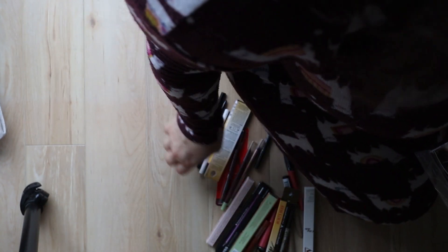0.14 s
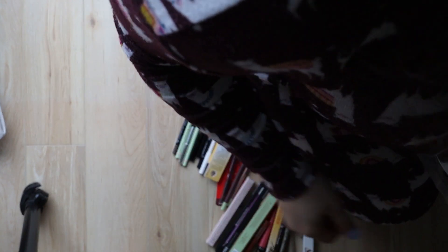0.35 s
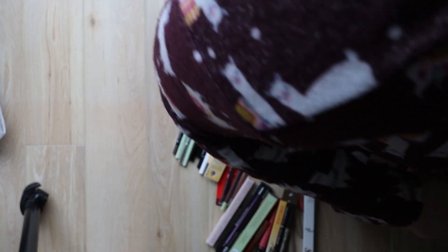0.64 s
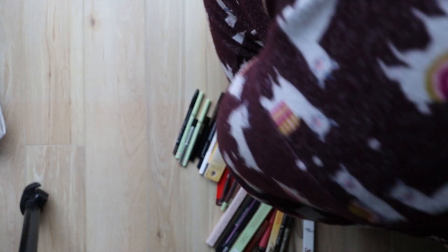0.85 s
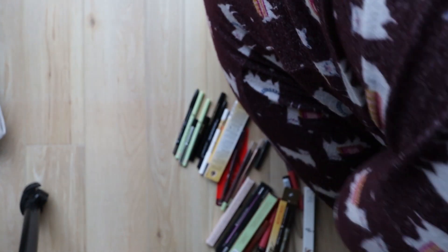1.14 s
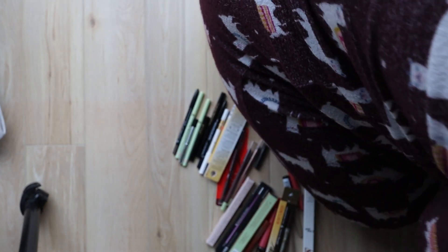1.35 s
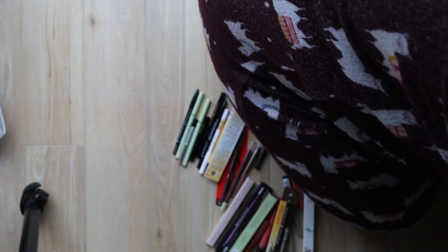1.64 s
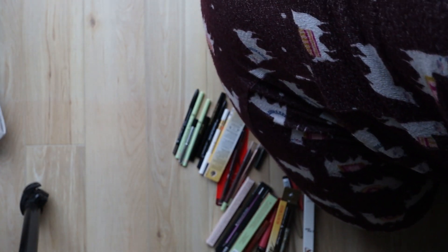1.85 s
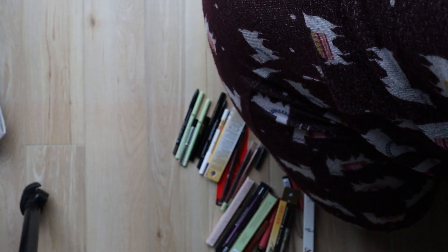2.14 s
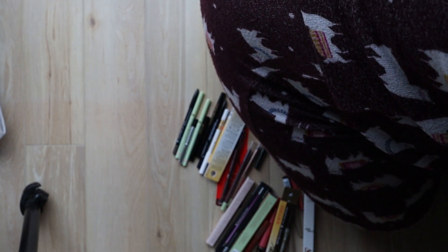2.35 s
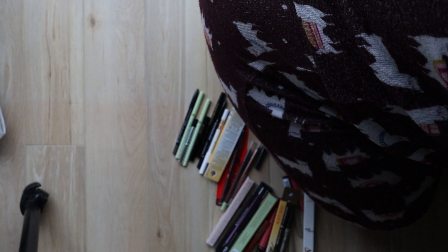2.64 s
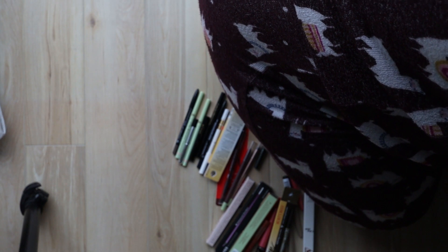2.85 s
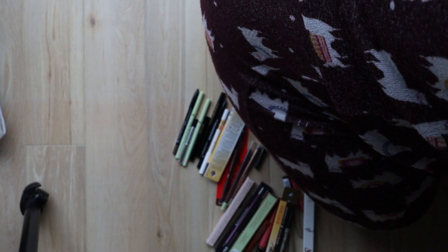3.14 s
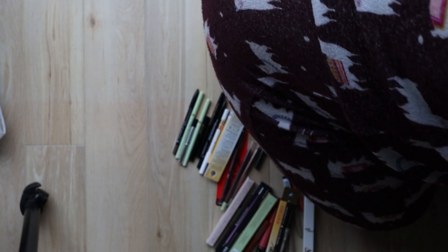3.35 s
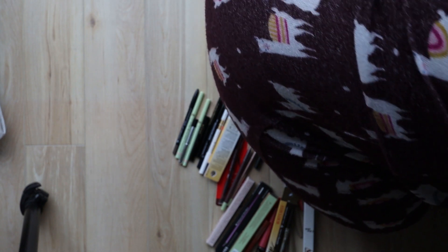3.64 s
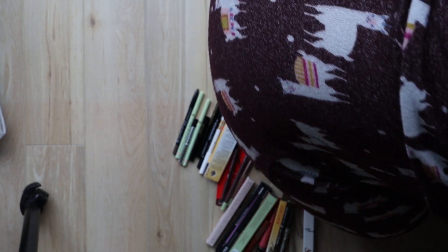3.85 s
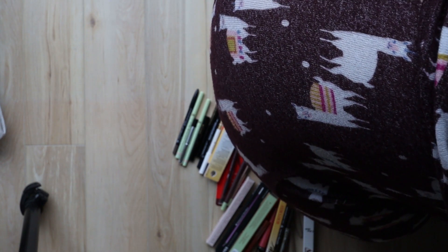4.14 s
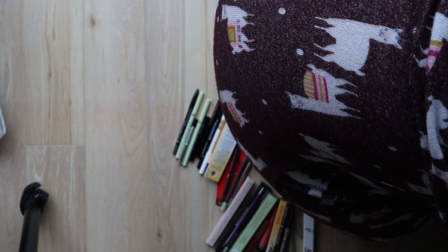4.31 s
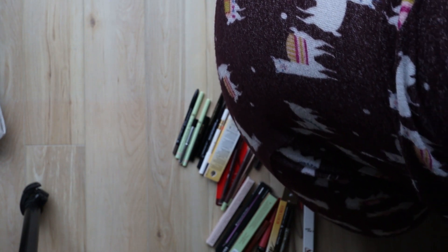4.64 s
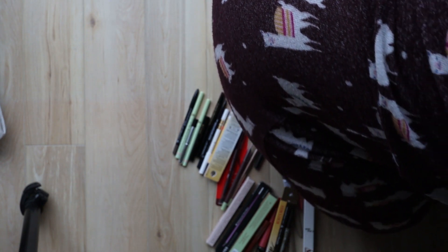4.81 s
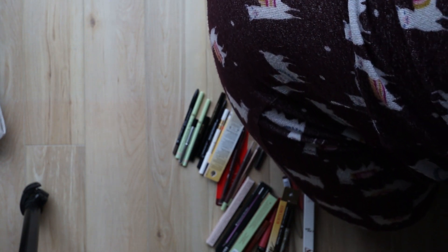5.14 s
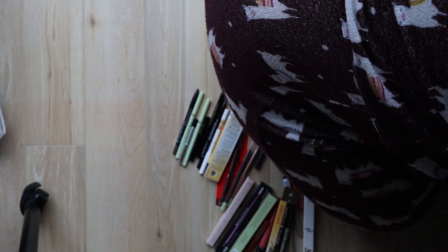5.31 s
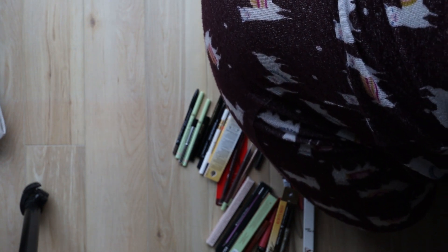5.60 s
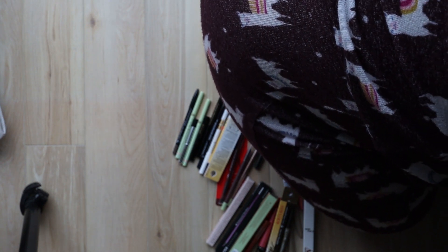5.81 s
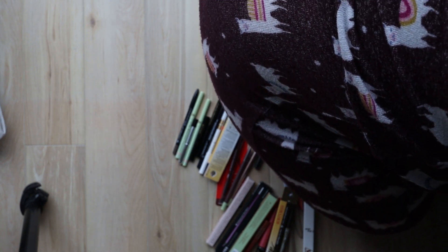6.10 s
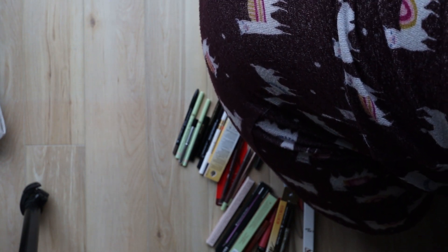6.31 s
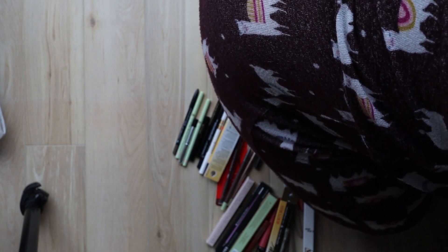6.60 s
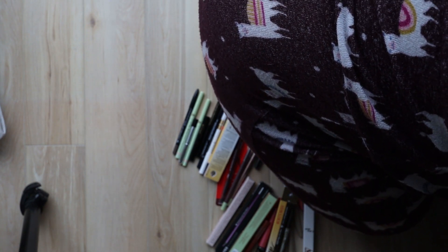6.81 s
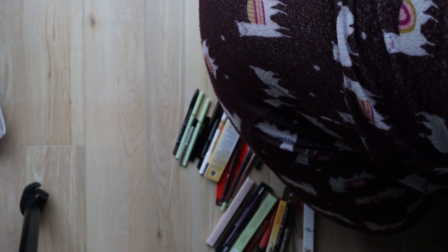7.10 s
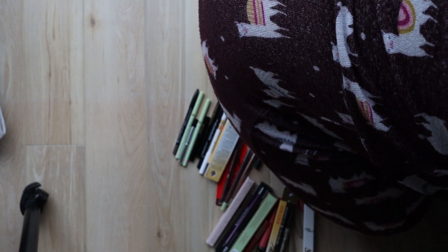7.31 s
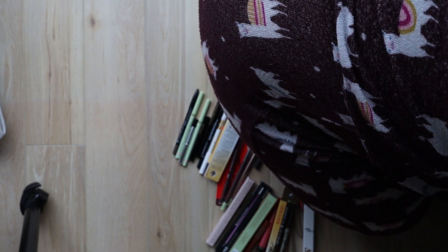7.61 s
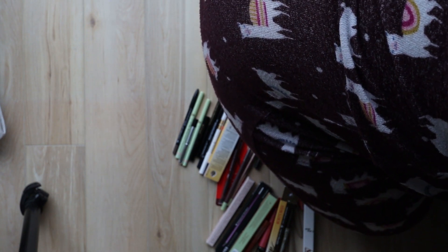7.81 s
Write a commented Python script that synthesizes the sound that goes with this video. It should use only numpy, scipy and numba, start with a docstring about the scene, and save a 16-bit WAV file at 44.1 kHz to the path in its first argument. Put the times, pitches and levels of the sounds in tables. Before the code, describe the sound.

Hollow plastic pencils and tubes knock and clatter in short bursts on a wooden floor, with quiet gaps and a faint low hum.

```python
"""Plastic pencils and tubes are set down, knocked and shuffled on a wooden floor in a small furnished room.
Soft knocks lead to a hard flurry at 1.4 s; then sparse, mostly quiet ones until a burst at 4.3 s, and clusters
from 5 s to the end. Each knock rings hollow plastic, cracks and thumps the boards; fine ticks rattle around them.
A short room tail answers over low hum and hiss; the recorder ducks after loud knocks and clips the hardest."""
import sys
import numpy as np
from scipy import signal
from scipy.fft import rfft, irfft
from scipy.io import wavfile
from scipy.ndimage import uniform_filter1d
from numba import njit

SR = 44100
rng = np.random.default_rng(int(sys.argv[2]) if len(sys.argv) > 2 else 0)


def persist_wave(psi):
    """Save psi, clipped to +-1, as 16-bit WAV."""
    counts = np.round(np.clip(psi, -1, 1) * 32767).astype(np.int16)
    wavfile.write(sys.argv[1], SR, np.atleast_2d(counts).T)


N = 351036
T = np.arange(N) / SR  # s


def undb(db):
    """Decibels to an amplitude factor."""
    return 10 ** (np.asarray(db) / 20)


def unit(x):
    """Scale to an RMS of 1."""
    return x / np.sqrt(np.mean(x ** 2))


def colour(x, points):
    """Filter through (Hz, dB) points joined on a log-frequency axis."""
    hz, db = np.transpose(points)
    f = np.fft.rfftfreq(len(x), 1 / SR)
    gain = undb(np.interp(np.log(f + 1), np.log(hz), db))
    return irfft(rfft(x) * gain, len(x))


def band(x, lo_hz, hi_hz):
    """Band-pass with gentle slopes."""
    sos = signal.butter(2, [lo_hz, min(hi_hz, SR / 2.1)], "band", fs=SR, output="sos")
    return signal.sosfilt(sos, x)


def thin(x, hz):
    """Slim objects radiate almost nothing below their lowest ring."""
    return signal.sosfilt(signal.butter(4, hz, "high", fs=SR, output="sos"), x)


def decay(t, t60):
    """Exponential die-away that falls 60 dB in t60 seconds."""
    return np.exp(-np.log(1000) * t / t60)


def ring(hz, db, t60):
    """A sum of decaying modes, struck at time 0."""
    t = T[:SR // 8, None]
    return np.sum(undb(db) * decay(t, t60) * np.sin(2 * np.pi * hz * t), axis=1)


@njit
def resonate(x, hz, q):
    """State-variable band-pass whose centre moves."""
    y, band_state, low_state = np.empty(len(x)), 0., 0.
    for i in range(len(x)):
        g = np.tan(np.pi * hz[i] / SR)
        v = (band_state + g * (x[i] - low_state)) / (1 + g * (g + 1 / q))
        band_state = 2 * v - band_state
        low_state += 2 * g * v
        y[i] = v / q
    return y


@njit
def follow(x, attack, release):
    """Envelope that rises fast and sinks slowly."""
    e, out = 0., np.empty(len(x))
    for i in range(len(x)):
        e += (abs(x[i]) - e) * (attack if abs(x[i]) > e else release)
        out[i] = e
    return out


def air():
    """Steady room tone and microphone hiss: coloured noise."""
    # Spectrum of the quiet room. Each row: frequency in Hz, relative density in dB per Hz.
    air_colour = [(20, -24), (50, -27.5), (90, -19), (130, -20.5), (200, -22.5), (320, -24), (400, -22),
                  (500, -26.5), (760, -26), (2000, -34), (16000, -41)]
    level_db = -54
    return undb(level_db) * unit(colour(rng.standard_normal(N), air_colour))


def hum():
    """A low tone that sags slowly, with a wavering undertone of narrow-band noise."""
    # Loudness of the hum at the microphone. Each row: time in seconds, RMS level of the tone in dB.
    hum_levels = [(0, -57), (.6, -61.5), (1.8, -57), (2.8, -52.5), (3.7, -50), (4.92, -50), (5.2, -59),
                  (6.3, -56.5), (7.8, -59)]
    hum_hz, sag_hz_per_s = 91, 0.7
    undertone_hz, undertone_width_hz, undertone_db = 75.5, 5.8, -11.5
    drift = 0.6 * np.cumsum(rng.standard_normal(N)) / np.sqrt(SR)  # random walk of the phase, radians
    # halving the sag here makes the pitch itself fall at the full rate
    tone = np.sqrt(2) * np.sin(2 * np.pi * (hum_hz - sag_hz_per_s * T / 2) * T + drift)
    q = undertone_hz / undertone_width_hz
    centre = np.full(N, 1. * undertone_hz)
    once = resonate(rng.standard_normal(N), centre, q)
    undertone = unit(resonate(once, centre, q))
    level = undb(np.interp(T, *np.transpose(hum_levels)))
    return level * (tone + undb(undertone_db) * undertone)


def tail():
    """The walls' answer to one spot: dense, with a very quick onset, each band dying at its own rate."""
    # How the furnished room dies away. Each row: frequency in Hz, t60 in seconds, relative level in dB.
    room_bands = [(202, 0.32, 13.5), (500, 0.29, 3), (1200, 0.45, 0), (3000, 0.47, -1), (7100, 0.47, 4),
                  (13000, 0.21, 2)]
    tail_db = -5  # energy of the whole tail against the direct sound
    t = T[:SR // 2]
    hz, t60, db = np.transpose(room_bands)
    out = 0
    for f in 140 * 2 ** np.arange(0, 7, .5):  # half-octave bands
        fall = decay(t, np.interp(np.log(f), np.log(hz), t60))
        level = undb(np.interp(np.log(f), np.log(hz), db))
        out = out + level * fall * band(rng.standard_normal(len(t)), f, f * np.sqrt(2))
    out = out * (1 - np.exp(-t / 0.00022))
    return undb(tail_db) * out / np.sqrt(np.sum(out ** 2))


def room(dry):
    """The contacts hop between a few spots, and each spot has its own paths to the microphone."""
    spots, spot_s = 5, .03
    spot = (T / spot_s).astype(int) % spots
    out = np.zeros(N)
    for k in range(spots):
        # a 10 ms crossfade from spot to spot
        fade = np.sqrt(np.abs(uniform_filter1d(1. * (spot == k), SR // 100)))
        out += signal.fftconvolve(dry * fade, tail())[:N]
    return out


def jostles():
    """Each jostle swells to its loudest moment and fades; the loudest one sets the pitch."""
    # Pencils rolling and jostling on the floor. Each row: loudest moment in seconds, relative level in dB,
    # click level against the ring in dB, pitch of the loudest piece in Hz, swell in dB/s, fade in dB/s.
    jostle_rows = [(0.724, -49, -31, 1420, 58, 70.5), (0.935, -29, -13.5, 1160, 274, 570),
                   (1.024, -52.5, -20.5, 1380, 500, 135), (1.271, -39.5, -37, 1100, 907, 101),
                   (1.354, -13.5, -18, 996, 1396, 907), (1.373, -23, -13.5, 1360, 392, 114.5),
                   (1.48, -17.5, -6, 1310, 150, 133), (1.547, -21.5, -15, 1410, 199.5, 341.5),
                   (1.913, -13.5, -9.5, 1500, 9000, 702), (1.94, -35, -6.5, 1900, 1003.5, 114),
                   (2.16, -32, -5.5, 1382, 494, 156), (2.389, -49, -12, 1240, 56, 106),
                   (2.694, -52, -7, 870, 200.5, 86.5), (4.144, -45.5, -19, 1230, 792, 37.5),
                   (4.284, -35.5, -8, 1000, 98.5, 301.5), (4.306, -7.5, -8.5, 1240, 4000, 700),
                   (4.328, -17.5, -7, 1250, 593.5, 121.5), (4.66, -35, -10.5, 1030, 4000, 135),
                   (4.754, -46.5, -12.5, 1160, 1000, 73.5), (4.842, -28, -14, 1010, 3000, 223),
                   (5.058, -7.5, -7, 1080, 15000, 699.5), (5.091, -36, -2, 1090, 596, 87.5),
                   (5.202, -9.5, -17.5, 1040, 830, 250), (5.27, -16.5, -9, 900, 205, 200),
                   (5.39, -12.5, -10, 1170, 598, 315), (5.707, -25, -8, 1320, 5000, 78.5),
                   (6.046, -16, -9, 1030, 899, 416), (6.115, -34, -3, 1000, 152, 196),
                   (6.152, -16, -11.5, 912, 4000, 348), (6.796, -30.5, -17, 845, 1200, 200),
                   (6.873, -25, -17, 1652, 4998, 258), (6.98, -32, -9, 800, 4000, 400),
                   (7.009, -29.5, -14, 1060, 3000, 300), (7.157, -17, -8.5, 1030, 1500, 343.5),
                   (7.53, -14.5, -6.5, 920, 12000, 262), (7.658, -7, -7.5, 981, 1494.5, 412),
                   (7.773, -7, -7, 933, 9000, 700), (7.793, -8, -9.5, 935, 800, 380)]
    s, db, bright_db, hz, swell, fade = (c[:, None] for c in np.transpose(jostle_rows))
    coarse = T[::44]  # about 1 ms steps
    before, after = np.maximum(s - coarse, 0), np.maximum(coarse - s, 0)
    rings = undb(db - swell * before - fade * after)
    clicks = undb(bright_db) * rings
    pitch_hz = hz[np.argmax(rings, axis=0), 0]
    return (np.interp(T, coarse, c) for c in (rings.sum(axis=0), clicks.sum(axis=0), pitch_hz))


def rattle():
    """Many small uneven ticks: a brief hollow ring and a brighter click each."""
    # Hollow colour of the heap of ticks. Each row: frequency in Hz, relative density in dB per Hz.
    tick_colour = [(120, -56), (200, -46), (436, -38.5), (497, -18), (812, -3), (1180, -8.5), (1440, -3.5),
                   (2120, -10.5), (3500, -27.5), (4550, -37.5), (7700, -120)]
    # Bright colour of the clicks, each pair: frequency in Hz, relative gain in dB.
    click_colour = [(1300, -35.5), (2400, 10), (3500, 10), (7000, -5.5), (12000, -22), (16000, -34)]
    ticks_per_s, scatter_db = 1400, 1.8
    when, size = rng.random(N), rng.exponential(size=N)
    ticks = (when < ticks_per_s / SR) * undb(scatter_db * size)
    # each tick is a contact of a few milliseconds
    contact = signal.lfilter([1], [1, -np.exp(-1 / (0.003 * SR))], ticks)
    rings, clicks, pitch_hz = jostles()
    heap = unit(colour(contact * rng.standard_normal(N), tick_colour))
    piece = unit(resonate(contact * rng.standard_normal(N), pitch_hz, 7.3))
    click = unit(colour(contact * rng.standard_normal(N), click_colour))
    return thin(rings * (0.62 * heap + .3 * piece), 450) + clicks * click


def knocks():
    """Every knock rings a tube, snaps a short crack and thumps the boards, each a little differently."""
    # Knocks on the floor. Each row: start in seconds, level in dB, pitch of the struck piece in Hz,
    # crack and board thump against the ring, both in relative dB, ring time in seconds before limiting.
    knock_rows = [(0.678, -43, 687, -2, -21, 0.068), (0.705, -36.5, 1486, -29.5, -8, 0.1),
                  (0.783, -37.5, 1100, -20, -49, 0.068), (0.847, -26.5, 1350, -16, -27, 0.023),
                  (0.891, -18.5, 1510, -37, -42, 0.015), (0.905, -21, 1300, -11, -30.5, .015),
                  (0.913, -22, 970, -14, -33, 0.075), (0.935, -19, 1037, -16, -8, 0.046),
                  (1.013, -24, 1500, -29.5, -7.5, 0.052), (1.171, -34, 1390, -35, 1.5, 0.008),
                  (1.274, -21.5, 1400, -14, -4.5, 0.015), (1.31, -24, 960, -18, -34, 0.021),
                  (1.319, -21, 900, -14.5, -5, 0.033), (1.357, 1, 1415, -6.5, -41, 0.054),
                  (1.384, -7, 850, -10, -44, 0.017), (1.405, -10, 884, -12, -59, 0.045),
                  (1.421, -10, 2100, -11, -19, 0.091), (1.446, -3.5, 790, -15.5, -77, 0.036),
                  (1.469, 0, 2060, -14, -20, 0.015), (1.488, -1.5, 1570, -17.5, -19, 0.024),
                  (1.501, -6, 1420, -5, -12, 0.017), (1.515, -9, 1030, -1.5, -57, 0.065),
                  (1.549, -3.5, 1450, -13.5, -47, 0.021), (1.561, -14, 1680, -13, -36, 0.014),
                  (1.91, -6.5, 1490, -18.5, -6, 0.0033), (1.945, -25, 1820, 1.5, -18, 0.01),
                  (2.119, -26, 1400, -6.5, -27.5, 0.034), (2.139, -19.5, 964, -12, -18, 0.1),
                  (2.183, -24, 1260, -12, -0.5, 0.04), (2.229, -26.5, 1356, -8, -18.5, 0.024),
                  (2.347, -36, 614, -27, -24, 0.023), (2.367, -31, 1290, -16, -2.5, 0.031),
                  (2.408, -40, 1340, -17, -19.5, 0.027), (3.06, -37, 830, -24, -6.5, 0.027),
                  (3.294, -42.5, 845, -25, -3.5, 0.026), (3.509, -31.5, 1670, -20, -21, 0.0061),
                  (3.82, -49.5, 540, 1.5, -25, 0.04), (3.986, -48, 810, 2, 12, 0.02),
                  (4.146, -30.5, 1230, -11.5, 9.5, 0.066), (4.19, -35, 440, -5, 9, 0.048),
                  (4.235, -22.5, 407, -25, -16, 0.02), (4.247, -29, 426, -13, 12, 0.024),
                  (4.275, -22, 1106, -17, 1, 0.041), (4.301, -5, 1034, -8.5, 4, 0.065),
                  (4.311, -5.5, 1530, -32, 0, 0.022), (4.385, -13, 1017, -33, -2, 0.052),
                  (4.438, -16.5, 980, -41, -9, 0.039), (4.655, -31, 957, -10, -7, 0.16),
                  (4.756, -18.5, 2710, -5.5, -19, 0.013), (4.84, -20.5, 3190, -23, -30, .015),
                  (4.84, -26.5, 890, -25, -0.5, 0.015), (4.907, -26, 1030, -36, -16, 0.01),
                  (4.938, -32, 820, -25, -38, 0.042), (5.052, 3.5, 1060, -19.5, -29.5, 0.023),
                  (5.182, -9.5, 975, -12, -9.5, 0.029), (5.201, 5, 1023, -17, -49, 0.018),
                  (5.216, -7.5, 1143, -4.5, -39, 0.11), (5.24, -10.5, 970, -7, -30, 0.048),
                  (5.269, -3, 780, -15, -20, 0.047), (5.299, -8.5, 890, -24.5, -37, 0.044),
                  (5.363, -10, 1520, -20, -10, 0.044), (5.376, -6, 960, -14, -34, 0.018),
                  (5.389, -17.5, 968, -14, -7, 0.038), (5.704, -27.5, 1290, 0.5, -33.5, 0.062),
                  (5.731, -12.5, 1307, -48, -33, 0.084), (5.752, -10, 1387, -19, -25, 0.035),
                  (5.775, -7, 1358, -28, -44, 0.042), (5.861, -22, 881, -11, -34, 0.1),
                  (5.968, -33, 2730, -1, -23.5, 0.037), (5.998, -32.5, 600, -17, -35, 0.074),
                  (6, -39, 2540, -36, -30, .03), (6.023, -16.5, 1280, -8, -9, 0.021),
                  (6.032, -9, 1034, -10, -40.5, 0.049), (6.045, -10.5, 850, -22, -22, 0.09),
                  (6.059, -18, 890, -31, -35, 0.053), (6.112, -20, 1040, -20.5, -32.5, 0.067),
                  (6.114, -21, 2520, -23, -30, .03), (6.128, -15, 2220, -15, -27, .012),
                  (6.149, -8, 875, -23.5, -33, 0.049), (6.77, -33, 685, -25, -14.5, 0.053),
                  (6.793, -17, 898, -32, -27, 0.04), (6.872, -13.5, 1410, -15, -6.5, 0.0037),
                  (6.888, -21.5, 1613, -42, -30, 0.098), (6.979, -28.5, 700, -24, -15, 0.032),
                  (7.004, -20.5, 977, -27, -25.5, 0.048), (7.137, -21, 733, -40, -40, 0.047),
                  (7.149, -14.5, 890, -27, -8.5, 0.022), (7.163, -18, 970, -2, -17, 0.019),
                  (7.527, -4.5, 928, -19, -26, 0.1), (7.549, -14, 860, -8, -53, 0.054),
                  (7.625, -15, 760, -13, -28, 0.044), (7.643, -10, 1290, -28, -28, 0.032),
                  (7.655, -0.5, 921, -17.5, -55, 0.055), (7.771, 1.5, 975, -14.5, -13.5, 0.071),
                  (7.789, -23, 905, -17, -32, 0.074), (7.802, -8.5, 1000, -24, -34, 0.029),
                  (7.814, -10, 847, -44, -18, 0.076), (7.837, -23, 784, -17, -25, 0.033)]
    # Modes of a plastic tube. Each row: multiple of its pitch, relative level in dB, share of its ring time.
    tube_modes = [(.8, -41.5, 0.72), (1, 9, 1), (1.22, -3, 0.55), (1.5, 5.5, 0.34), (1.9, -3.5, 0.52),
                  (2.502, -2.5, 0.32), (3.298, -26.5, 0.28), (4.4, -23.5, .15)]
    # Modes of the floor boards. Each row: nominal frequency in Hz, relative level in dB, ring time in seconds.
    board_modes = [(212, -25, 0.06), (317, -21, 0.077), (369, -25, 0.15), (440.3, -15, 0.098),
                   (620, -23, 0.034)]
    ratio, tube_db, share = np.transpose(tube_modes)
    board_hz, board_db, board_t60 = np.transpose(board_modes)
    size, count = SR // 8, len(ratio)
    t = T[:size]
    upper, main = ratio > 1, ratio == 1
    out = np.zeros(N + SR)
    chance = rng.standard_normal((len(knock_rows), 2, size))
    for (s, db, hz, crack_db, thump_db, t60), (c, noise) in zip(knock_rows, chance):
        # all modes but the main one are detuned at random
        modes_hz = hz * ratio * (1 + 0.076 * ~main * c[:count])
        # a harder contact cracks more and wakes the upper modes more
        modes_db = tube_db + upper * (0.66 * (crack_db + 20.5) + 0.83 * c[count:2 * count])
        tube = ring(modes_hz, modes_db, np.clip(t60, .004, .2) * share)
        thump = ring(board_hz * (1 + 0.061 * c[-len(board_hz):]), board_db, board_t60)
        # the piece lands, then chatters along its length for a few milliseconds
        chatter = 0.28 * noise * np.exp(-t / 0.0023) * (1 - np.exp(-t / 0.00073))
        chatter[0] = 1
        # the push lasts about a third of a cycle, which rounds the attack
        push = np.convolve(chatter, np.hanning(int(SR / hz / 3) + 3))[:size]
        tube = thin(signal.fftconvolve(tube, push)[:size], 0.54 * hz)
        crack = band(noise * np.exp(-t / 0.0094), 1500, 8200)
        crack += 0.17 * band(noise * np.exp(-t / 0.0067), 9000, 15000)
        blow = tube / np.abs(tube).max()
        blow += undb(crack_db) * crack
        blow += undb(thump_db) * band(thump, 200, 900)
        i = int(s * SR)
        out[i:i + size] += undb(db) * blow
    return out[:N]


def scene():
    """Pencils near the microphone, the room behind them."""
    pencils = knocks() + rattle()
    return (pencils + room(pencils) + hum() + air())[None]


def record(dry):
    """Gain control ducks after loud knocks, the hardest peaks clip, the top is cut."""
    attack_s, release_s, knee_db, top_hz = 0.053, .35, -18.5, 15800
    loud = follow(dry[0], 1 / (attack_s * SR), 1 / (release_s * SR))
    gain = (1 + loud / undb(knee_db)) ** -.3
    clipped = np.clip(undb(-0.5) * gain * dry, -1, 1)
    return signal.sosfilt(signal.ellip(10, .2, 70, top_hz, fs=SR, output="sos"), clipped)


dry = scene()
out = record(dry)
persist_wave(out)
```